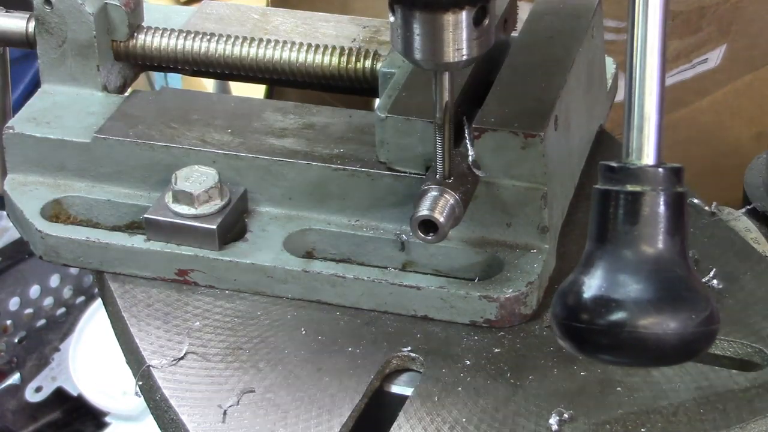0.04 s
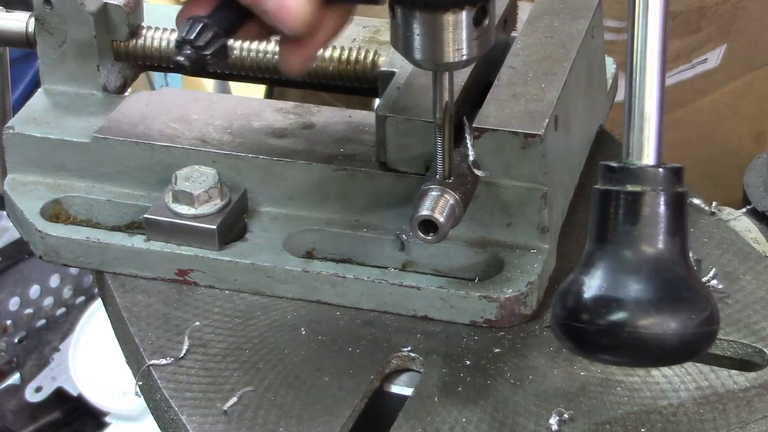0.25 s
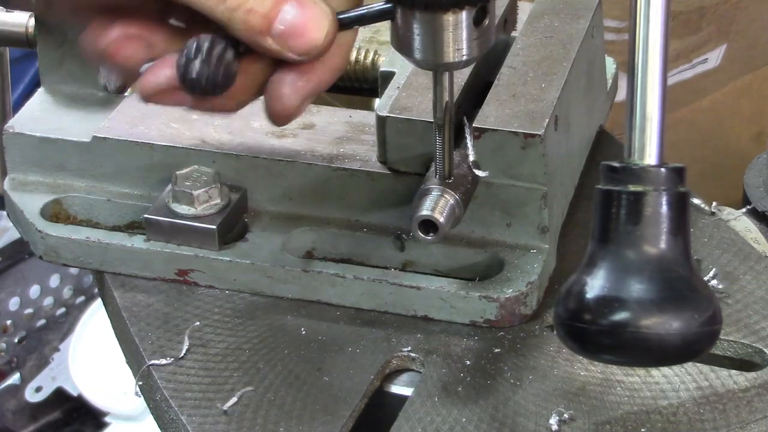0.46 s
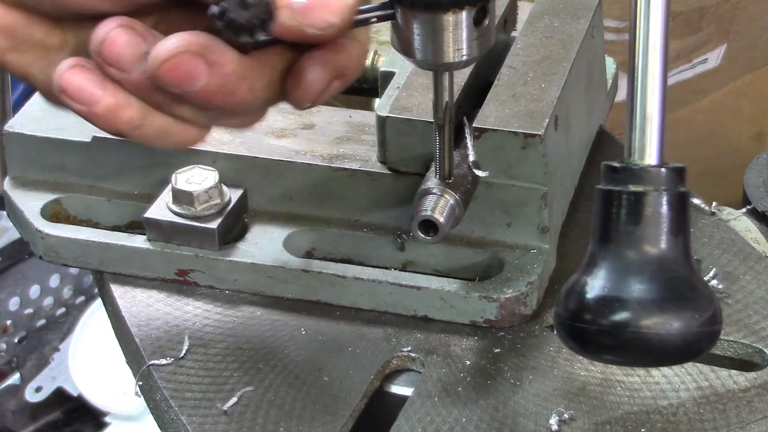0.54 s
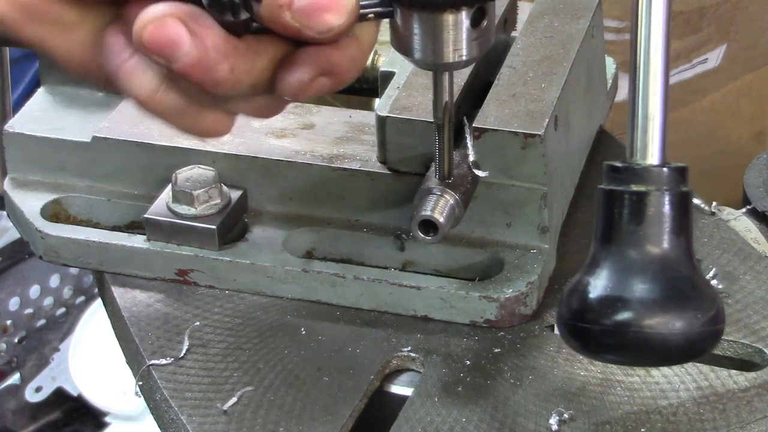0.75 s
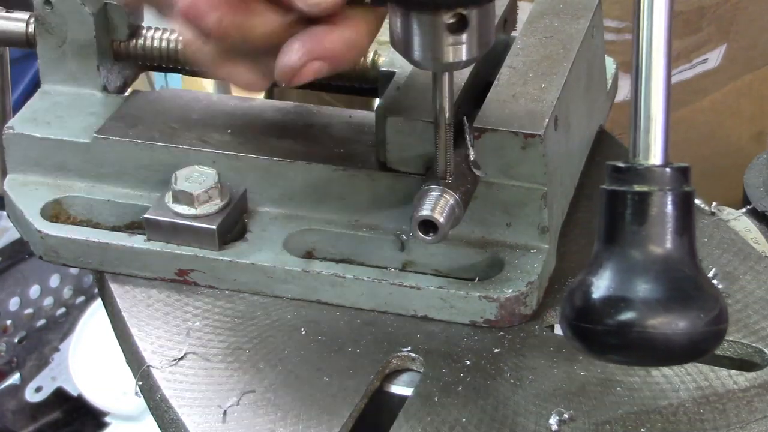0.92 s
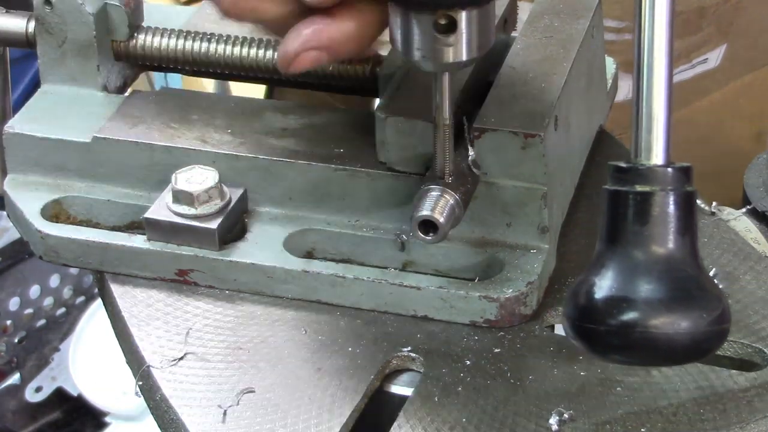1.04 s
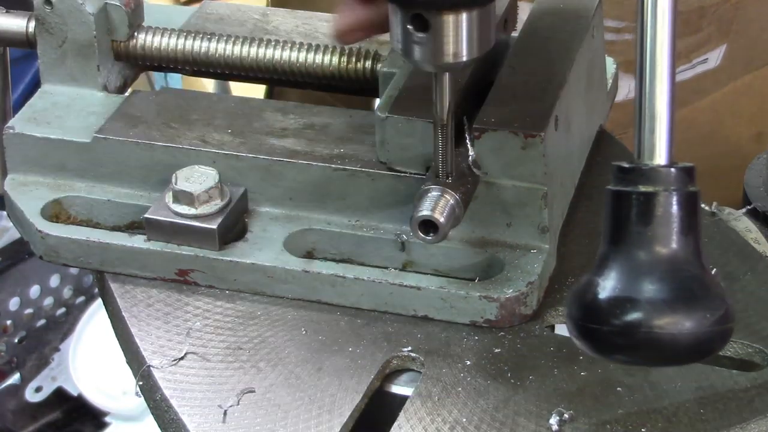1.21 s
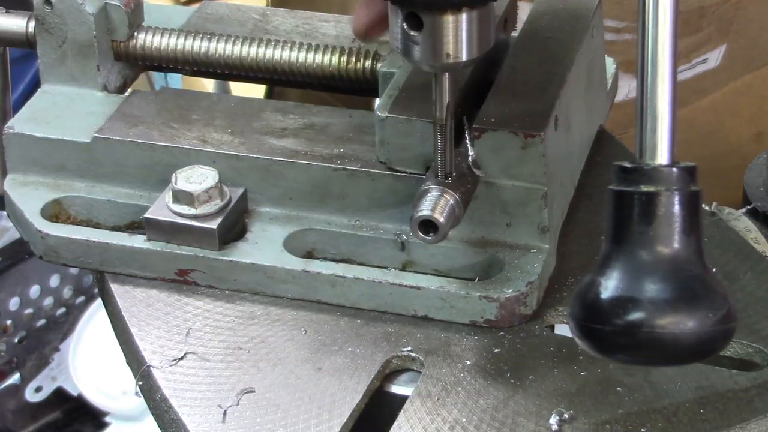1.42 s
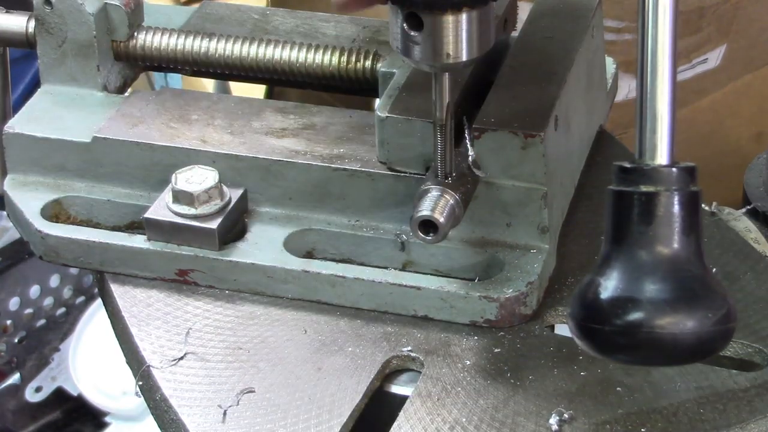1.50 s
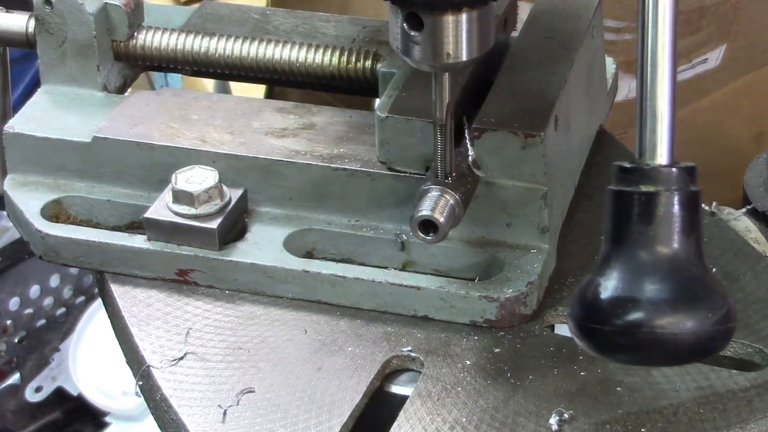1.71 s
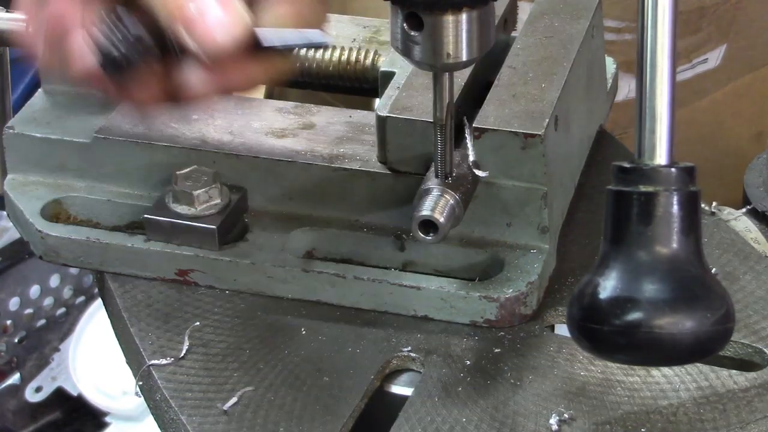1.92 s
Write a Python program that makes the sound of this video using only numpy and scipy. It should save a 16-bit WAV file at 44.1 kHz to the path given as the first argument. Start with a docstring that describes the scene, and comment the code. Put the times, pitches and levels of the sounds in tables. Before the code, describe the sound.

Metallic clunks and clinks from a chuck key worked in a drill press, close in a quiet workshop

```python
"""The spindle of a drill press knocks in its play as a key tightens the chuck on a tap; each knock rings the
hollow body by decaying sine modes, a noise clunk, one long hum and a low thud of the stand. The key, pushed in,
turned and pulled out, clinks (short steel modes and a noise crack) and scrapes (band-limited random impulses);
the hands add two faint rustles of the same kind. Heard from close by in a small, quiet workshop: a diffuse tail
of shaped noise, and a soft noise background."""
import sys
import numpy as np
from scipy import signal
from scipy.fft import rfft, irfft
from scipy.io import wavfile

SR = 44100
rng = np.random.default_rng(int(sys.argv[2]) if len(sys.argv) > 2 else 0)


def transcribe(u):
    """Save the signal u as a 16-bit wav file named by the first command-line argument.

    u: samples, shape (n,) or (channels, n), limited to [-1, 1]; the rate is SR.
    q: integer samples, one column per channel.
    """
    v = np.clip(np.atleast_2d(u).T, -1, 1)
    q = np.round(v * 32767).astype(np.int16)
    wavfile.write(sys.argv[1], SR, q)


N = 85995

# workshop background, relative spectral density: [f/Hz, level/dB]
BACKGROUND_SPECTRUM = [(15, -43), (25, -6.5), (87, -4), (120, -6), (153, -9), (229, -8.5), (277, -11),
                       (427, -6), (591, -9.5), (988, -15), (1480, -19), (2160, -22.5), (16000, -43.5)]
# background level in time: [t/s, level/dB]
BACKGROUND_LEVEL = [(0, -58.5), (.18, -56), (0.798, -54), (1.1, -55.5), (1.3, -53), (1.55, -54.5),
                    (1.95, -54)]
# knocks of the spindle: [t/s, level/dB, hardness/(dB per octave), stand thud level/dB, ring length factor]
SPINDLE_KNOCKS = [(.002, -42.5, 6, -51, 0.91), (.2322, -16.5, 22, -32, 0.72),
                  (.2412, -6.5, -10.5, -46, 0.77), (.3375, -11.5, -2, -66, 0.86),
                  (.3702, -19, 3, -49, 0.95), (.489, -22.5, 4, -47, 1.3), (0.5108, -16, 4, -50, 1.52),
                  (.5365, -5, 0.5, -45, 0.99), (.542, -12, -2.5, -52, 1.08), (.5674, -14, -10.5, -53, 0.89),
                  (.598, -27.5, -23.5, -41, 0.85), (.636, -32.5, -2.5, -51, 1.3),
                  (0.658, -30, -16.5, -53, 0.7), (1.594, -38.5, 30.5, -61, 1.3),
                  (1.610, -26.5, -4.5, -65, 1.37), (1.64, -17, 0, -64, 1.17),
                  (1.690, -30.5, 23.5, -53, 1.05), (1.729, -22.5, 14, -56, 0.82),
                  (1.7455, -22, 8, -40.5, 1.2), (1.7765, -34.5, -5, -65, 1.2), (1.8353, -31, -1, -70, 0.35)]
# modes of the press body, t60 before the ring length factor: [f/Hz, relative level/dB, t60/s]
BODY_MODES = [(168, -31.5, 0.14), (275.3, -33.5, 0.31), (369.4, -18, 0.27), (435.7, -11, 0.097),
              (539.4, -10, 0.11), (554.6, 1.5, 0.063), (580.7, -16, 0.092), (558.1, -19.5, .3),
              (623, -18.5, 0.16), (687, -20, 0.11), (785.7, -10.5, 0.055), (825.3, -13.5, 0.12),
              (895, -26, .1), (991, -41.5, 0.5), (1131, -29.5, 0.081)]
# dense short modes of the body, as a noise spectrum: [f/Hz, relative level/dB]
CLUNK_SPECTRUM = [(80, -17.5), (170, -8), (310, -19), (500, -4), (820, 1.5), (1050, -12.5), (1350, -13),
                  (2500, -33), (6000, -55)]
# reflections of the knocks from bench and wall: [delay t/s, level/dB]
NEAR_REFLECTIONS = [(.0091, -8), (.0292, -12)]
# diffuse reverberation by band: [centre f/Hz, level/dB, t60/s]
ROOM_BANDS = [(300, -24, 0.54), (1000, -13, 0.21), (3500, -7, 0.3), (10000, -9, 0.28)]
# clinks of the key: [t/s, low level/dB, middle level/dB, high level/dB,
#                     f favoured by the point of contact/Hz, its emphasis/dB]
KEY_CLINKS = [(.227, -23, -32, -26.5, 11900, -22), (0.2304, -19, -19.5, -24, 12000, 11),
              (0.3293, -35.5, -38.5, -46, 6300, 16), (0.3357, -34.5, -38, -43, 8000, 5),
              (.376, -43, -46.5, -58.5, 3500, 5), (.5065, -40.5, -56.5, -62, 2635, 13),
              (.536, -31, -44, -58, 2030, -1), (.549, -32.5, -40.5, -47, 10700, 3),
              (.631, -39.5, -60, -64, 2400, -14), (0.6663, -49.5, -43.5, -65, 4300, 3),
              (0.863, -57, -64, -63, 2070, 19), (1.6373, -33.5, -34, -43.5, 2514, 17.5),
              (1.686, -28, -20.5, -40, 4255, 4), (1.6955, -37, -34, -43, 1402, 24.5),
              (1.731, -28, -41, -48, 10150, 17), (1.7435, -28, -22.5, -36.5, 8300, 8)]
# where the low, middle and high clink levels apply: [f/Hz]
CLINK_LEVEL_HZ = [2130, 4300, 11500]
# modes of key and chuck: [f/Hz, relative level/dB, t60/s]
KEY_MODES = [(1403, -13.5, 0.046), (1438, -23.5, 0.13), (2017, -18, 0.073), (2275, -3.5, 0.014),
             (2418, -8.5, .035), (2612, -15.5, 0.073), (3603, -9.5, 0.016), (3900, -8, 0.032),
             (4103, -6.5, 0.016), (5400, -16.5, .03), (6037, -12.5, 0.016), (7760, -16.5, .035),
             (8120, -11, 0.047), (10280, -9, .022), (12200, -15, 0.024), (12080, -11, 0.048)]
# noise crack of the steel contact: [f/Hz, relative level/dB]
CRACK_SPECTRUM = [(500, 5), (1200, -4), (2500, 4), (3100, 0), (4000, -2), (7500, -0.5), (9000, -8.5),
                  (10500, 3.5), (12200, -5.5), (15500, -19)]
# scrapes of steel on steel, and at 0.93 s and 1.368 s faint rustles of handling: [t/s, length/s, level before
# the swell/dB, centre f/Hz]
SCRAPES = [(.495, 0.09, -50, 1300), (0.523, 0.14, -66, 6000), (0.677, 0.027, -63, 3970),
           (0.766, .06, -66, 3350), (.93, 0.11, -67.5, 2050), (1.368, 0.09, -69.5, 2480),
           (1.585, 0.054, -48.5, 1240), (1.692, 0.064, -45, 1240), (1.858, 0.075, -55, 2020)]

T = np.arange(16384) / SR  # time within one event, s
HZ = np.maximum(np.fft.rfftfreq(len(T), 1 / SR), 1)
THUD_HZ, THUD_T60_S, THUD_RISE_S = 59, 0.11, 0.0017
PIVOT_HZ = 578  # frequency whose level the hardness leaves unchanged
BLOOM_S = 0.0042  # build-up time constant at the pivot; inversely proportional to frequency
CLUNK_DB, CLUNK_T60_S, CLUNK_RISE_S = -19, 0.09, 0.0019
HUM_HZ, HUM_DB, HUM_T60_S = 547.6, -49.5, 2.16  # the one long ring; level relative to the knock
KEY_ROOM_DB = -6.5  # the key's modes reach the room more weakly than the crack
ROOM_RISE_S = 0.004
FAVOUR_OCTAVES = 0.062  # width of the emphasis round the favoured frequency
CONTACT_S = 0.00045  # time constant of the contact's build-up
CRACK_DB, CRACK_T60_S = -3, 0.031
GRIT_PER_S, GRIT_SPREAD_DB = 9000, 3  # mean impulse rate; standard deviation of impulse level
SCRAPE_SLOPE_DB = 4.5  # fall per octave squared either side of the centre
TOP_HZ = 15850


def amp(db):
    """Level definition: convert decibels to amplitude gain."""
    return 10 ** (np.asarray(db) / 20)


def unit(x):
    """Power normalisation: scale to rms 1."""
    return x / np.sqrt(np.mean(x ** 2))


def fade(t60):
    """Exponential damping: fall by 60 dB in t60, taken as at least 10 ms."""
    return np.exp(-np.log(1000) * T / max(t60, 1e-2))


def rise(time_constant_s):
    """Exponential build-up: approach 1 with the given time constant."""
    return 1 - np.exp(-T / time_constant_s)


def along(points, hz):
    """Logarithmic pitch scale: interpolate (f/Hz, level/dB) points on it."""
    f, db = np.array(points, float).T
    return np.interp(np.log(hz), np.log(f), db)


def shape(x, gain):
    """Linear filtering: multiply the spectrum by a gain at every frequency."""
    return irfft(rfft(x) * gain, len(x))


def noise(points, size=len(T)):
    """Spectral shaping: white noise given a (f/Hz, level/dB) spectrum and rms 1."""
    hz = np.maximum(np.fft.rfftfreq(size, 1 / SR), 1)
    return unit(shape(rng.standard_normal(size), amp(along(points, hz))))


def add(out, start_s, x):
    """Superposition: sum a sound into out from a given time."""
    i = int(np.clip(start_s * SR, 0, N - 1))
    out[i:i + len(x)] += x[:N - i]


def background():
    """Stationary noise: a soft, dull spectrum under a slowly varying level."""
    level_db = np.interp(np.arange(N) / SR, *np.array(BACKGROUND_LEVEL).T)
    return noise(BACKGROUND_SPECTRUM, size=N) * amp(level_db)


def knocks():
    """Modal excitation: a harder contact rings the body brighter, a gripping hand damps it sooner."""
    out, t = np.zeros(N), np.arange(N) / SR
    hz, db, t60 = np.array(BODY_MODES).T
    # the body takes up the blow gradually, its low modes slowest
    bloom = 1 - np.exp(-T * hz[:, None] / PIVOT_HZ / BLOOM_S)
    modes = np.sin(2 * np.pi * hz[:, None] * T) * bloom
    hum = amp(HUM_DB) * np.sin(2 * np.pi * HUM_HZ * t) * np.exp(-np.log(1000) * t / HUM_T60_S)
    clunk_envelope = amp(CLUNK_DB) * fade(CLUNK_T60_S) * rise(CLUNK_RISE_S)

    def octaves(f):
        """Spectral tilt: distance from the pivot in octaves, limited both ways."""
        return np.clip(np.log2(f / PIVOT_HZ), -.6, .8)

    for start, level_db, hardness, _, length in SPINDLE_KNOCKS:
        decays = np.array([fade(s * length) for s in t60])
        ring = amp(db + hardness * octaves(hz)) @ (modes * decays)
        clunk = shape(noise(CLUNK_SPECTRUM), amp(hardness * octaves(HZ))) * clunk_envelope
        add(out, start, amp(level_db) * (ring + clunk))
        add(out, start, amp(level_db) * hum)
    return out


def thuds():
    """Low-frequency resonance: each knock also shakes the stand, a damped sine."""
    out = np.zeros(N)
    thud = np.sin(2 * np.pi * THUD_HZ * T) * fade(THUD_T60_S) * rise(THUD_RISE_S)
    for start, _, _, thud_db, _ in SPINDLE_KNOCKS:
        add(out, start, amp(thud_db) * thud)
    return out


def workshop(x):
    """Diffuse reverberation: convolve with noise whose decay time depends on frequency."""
    tail = np.zeros(len(T))
    log_centres = np.log([row[0] for row in ROOM_BANDS])
    for share, (_, db, t60) in zip(np.eye(len(ROOM_BANDS)), ROOM_BANDS):
        envelope = fade(t60) * rise(ROOM_RISE_S)
        # neighbouring bands cross over in power
        band_gain = np.sqrt(np.interp(np.log(HZ), log_centres, share))
        band = shape(rng.standard_normal(len(T)), band_gain)
        tail += amp(db) * band * envelope / np.sqrt(np.sum(envelope ** 2))
    return signal.fftconvolve(x, tail)[:N]


def reflected(x):
    """Specular reflection: add two delayed, weaker copies to the direct sound."""
    out = x.copy()
    for delay_s, db in NEAR_REFLECTIONS:
        add(out, delay_s, amp(db) * x)
    return out


def clinks():
    """Impact of steel on steel: short modes and a crack, coloured by the point of contact."""
    rings, cracks = np.zeros((2, N))
    hz, db, _ = np.array(KEY_MODES).T
    modes = np.array([np.exp(2j * np.pi * f * T) * fade(t60) for f, _, t60 in KEY_MODES])
    contact = rise(CONTACT_S)
    for start, low_db, middle_db, high_db, favoured_hz, emphasis_db in KEY_CLINKS:
        levels = list(zip(CLINK_LEVEL_HZ, (low_db, middle_db, high_db)))

        def colour(f):
            """Selective excitation: gain by range, with a narrow bell at the favoured frequency."""
            bell = np.exp(-(np.log2(f / favoured_hz) / FAVOUR_OCTAVES) ** 2)
            return amp(along(levels, f) + emphasis_db * bell)

        phases = np.exp(2j * np.pi * rng.random(len(hz)))
        ring = ((amp(db) * colour(hz) * phases) @ modes).imag
        crack = amp(CRACK_DB) * shape(noise(CRACK_SPECTRUM), colour(HZ)) * fade(CRACK_T60_S)
        add(rings, start, contact * ring)
        add(cracks, start, contact * crack)
    return rings, cracks


def scrapes():
    """Sliding friction: dense random impulses round a centre frequency swell and die away."""
    out, size = np.zeros(N), len(T)
    for start, length, level_db, centre_hz in SCRAPES:
        hits = rng.random(size) < GRIT_PER_S / SR
        signs = rng.choice([-1, 1], size)
        grit = hits * signs * amp(GRIT_SPREAD_DB * rng.standard_normal(size))
        grit = unit(shape(grit, amp(-SCRAPE_SLOPE_DB * np.log2(HZ / centre_hz) ** 2)))
        swell = np.sin(np.pi * np.minimum(T / length, 1))
        add(out, start, amp(level_db) * grit * swell)
    return out


def scene():
    """Superposition of direct sound, room, thuds and background."""
    rings, cracks = clinks()
    handling = reflected(knocks()) + cracks + scrapes()
    room = workshop(handling + amp(KEY_ROOM_DB) * rings)
    return (handling + rings + room + thuds() + background())[None]


def record(dry):
    """Band limitation: a steep elliptic low-pass removes the extreme treble."""
    low_pass = signal.ellip(10, .2, 80, TOP_HZ, fs=SR, output="sos")
    return signal.sosfilt(low_pass, dry)


dry = scene()
out = record(dry)
transcribe(out)
```